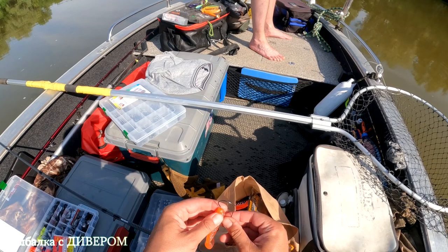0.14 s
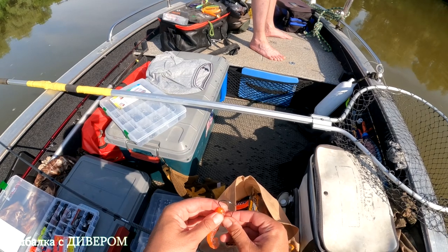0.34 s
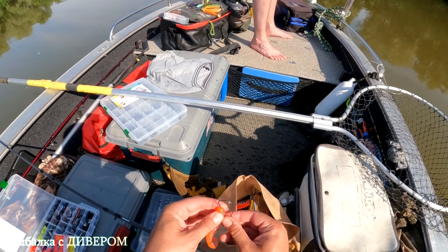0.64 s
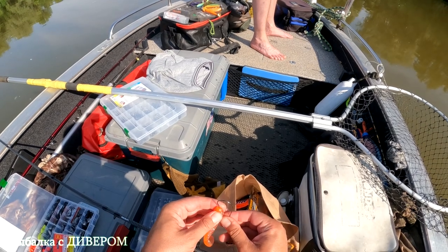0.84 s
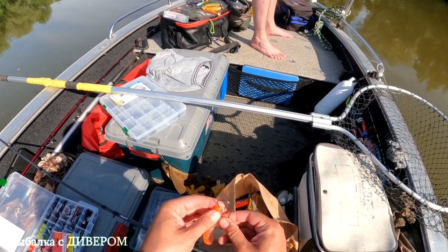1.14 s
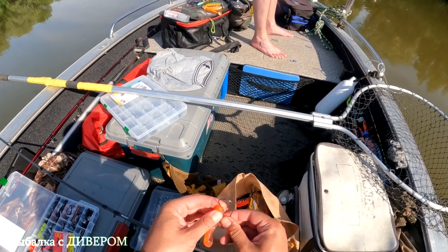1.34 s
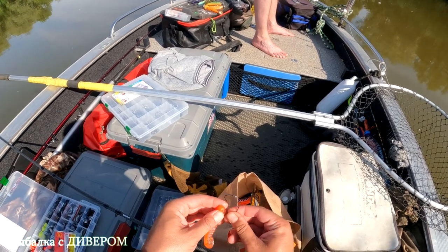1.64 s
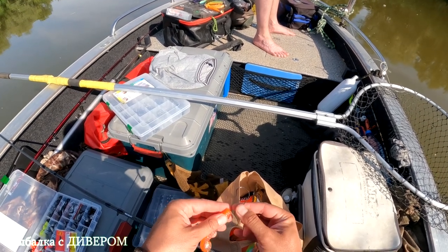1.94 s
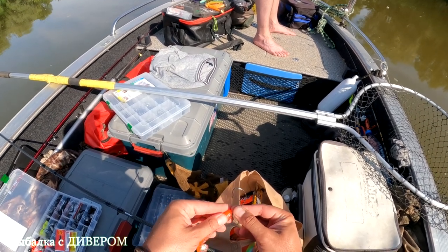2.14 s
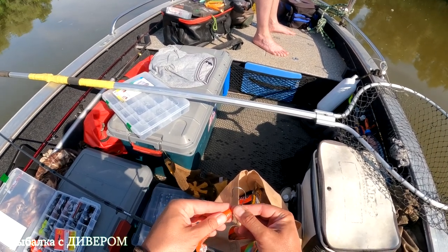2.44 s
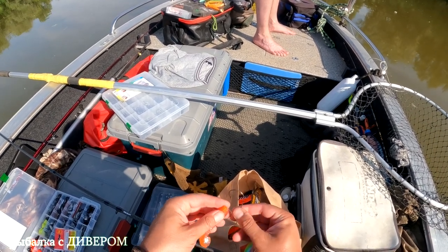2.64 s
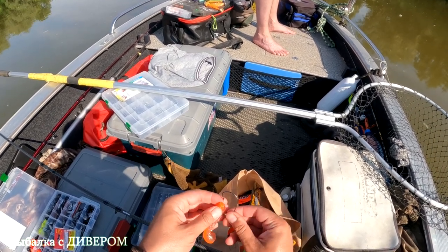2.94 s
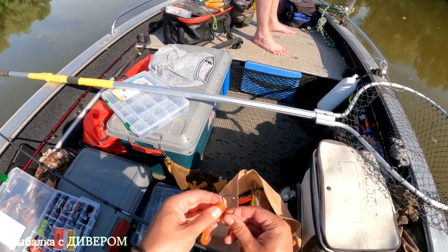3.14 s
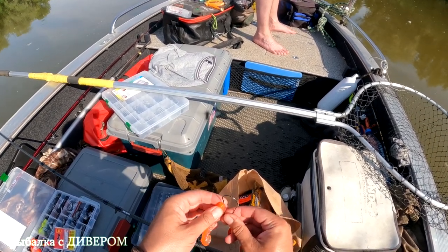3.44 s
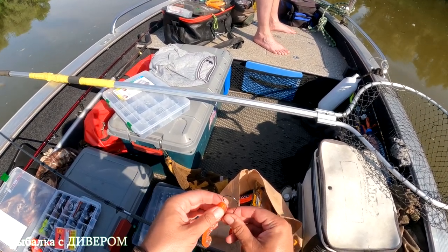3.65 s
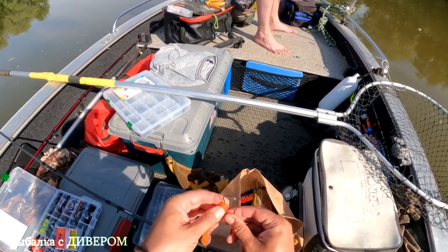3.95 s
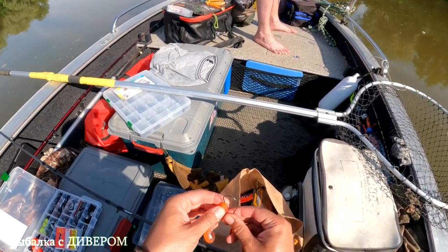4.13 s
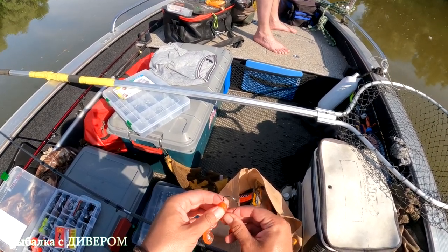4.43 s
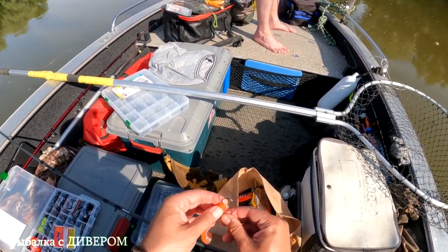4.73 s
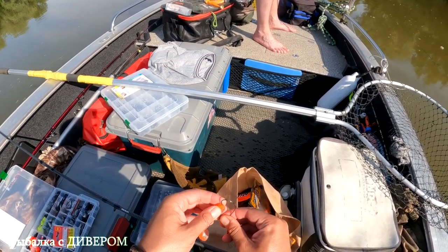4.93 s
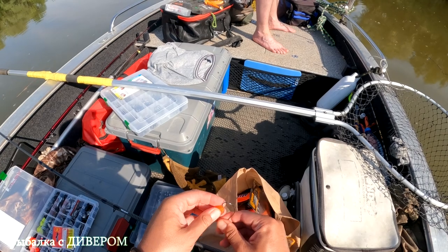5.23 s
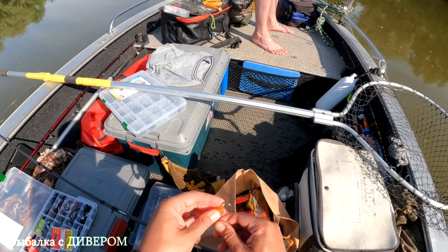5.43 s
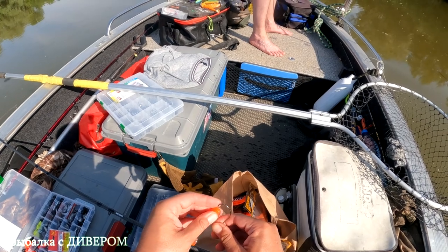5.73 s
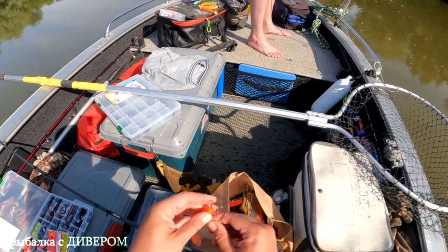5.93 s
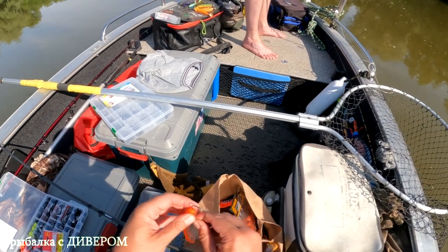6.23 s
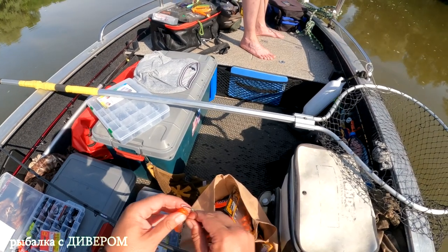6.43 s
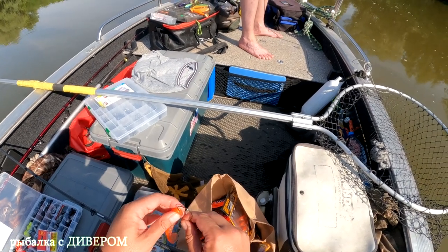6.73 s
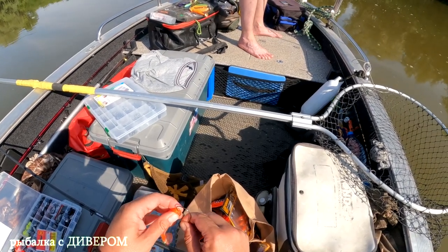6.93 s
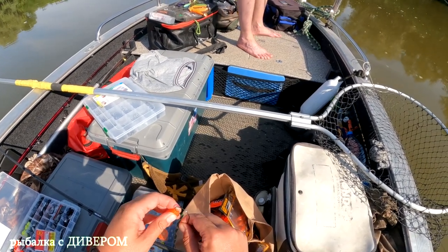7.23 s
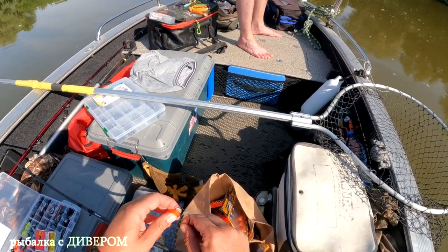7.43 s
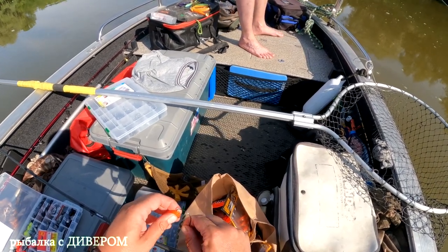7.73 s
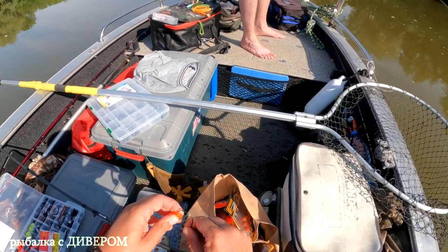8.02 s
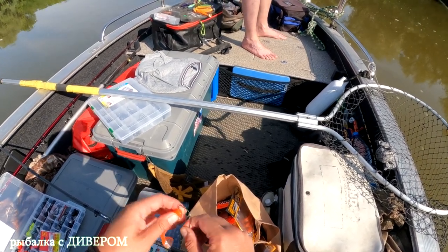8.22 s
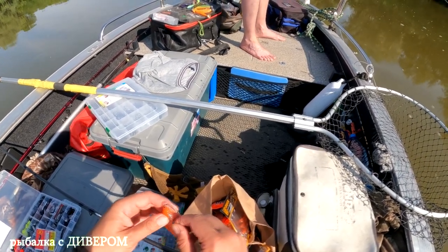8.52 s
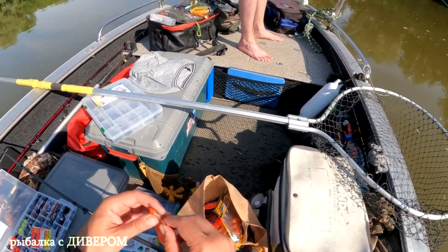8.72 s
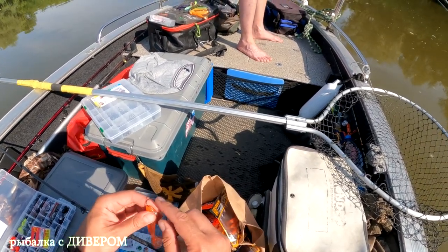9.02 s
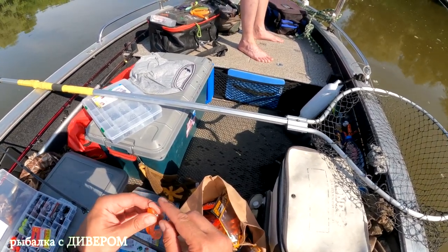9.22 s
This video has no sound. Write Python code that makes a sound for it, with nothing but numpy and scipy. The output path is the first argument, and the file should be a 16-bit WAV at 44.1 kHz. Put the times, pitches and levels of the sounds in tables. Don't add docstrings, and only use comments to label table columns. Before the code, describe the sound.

Outdoor stereo from a boat on calm water, with low drone and faint insect hiss throughout. A bird calls sharply now and then; a frog pumps rattling pulses; dry wing scrapes buzz in the reeds. Mid-way a clear finch song rises from faint notes, trills downward and ends in a flourish. Distant birds then swell together and fade, with small clicks and a brief scrape on deck at the end.

```python
import sys
import numpy as np
from scipy import signal
from scipy.fft import rfft, irfft
from scipy.io import wavfile
from scipy.ndimage import uniform_filter1d

SR = 44100
rng = np.random.default_rng(int(sys.argv[2]) if len(sys.argv) > 2 else 0)


def decibels_to_gain(level_db):
    exponent = np.asarray(level_db, float) / 20
    return 10 ** exponent


def unload_wav(signal):
    wavfile.write(
        sys.argv[1],
        SR,
        np.round(np.clip(np.atleast_2d(signal).T, -1, 1) * 32767).astype(np.int16),
    )


N = 413216
HZ = np.maximum(np.fft.rfftfreq(N, 1 / SR), 1)
T = np.arange(N) / SR

# (t/s from its start, f/Hz, level/dB[, warble depth/Hz])
RISE = [(0, 4730, -29), (.012, 5120, -10), (.022, 5396, -6.5), (.035, 5550, -39)]
TICK = [(0, 7300, -4, 300), (.006, 6820, -1.5, 400), (.016, 6200, 3, 400), (.024, 5850, 1, 300)]
SEET = [(0, 5350, -4, -600), (.018, 5450, 0, -550), (.028, 5600, 4, -420), (.04, 5550, -2, -400)]
CHIRP = [(0, 7010, -24.5, 1), (.003, 4390, -6.5, 3), (.006, 4590, -13, 294), (.011, 4606, -3.5, 148),
         (.016, 4680, -2, 68), (.023, 4465, -13.5, 150), (.03, 4311, -10, -1)]
GULP = [(0, 3240, -8, 251), (.012, 3210, -8.5, 250.5), (.03, 3130, -7.5, 200), (.042, 2955, -10, 150),
        (.052, 2924, -21, 150)]
FLICK = [(0, 3970, -8, 100), (.005, 4460, -13.5, 200), (.01, 4965, 3.5, 200.8), (.015, 5236, -14, 150),
         (.02, 5150, -32, 100)]
RASP = [(0, 5250, -15, 1150), (.02, 5150, -5, 1200), (.05, 4700, -2, 1000), (.065, 4300, -4, 800)]
HOLD = [(0, 1000, -9), (.02, 1000, 0), (.1, 1002, -2), (.16, 1000, -16)]
RATTLE = [(0, 3740, -17, 300), (.006, 3700, -3, 330), (.022, 3774, 1.5, 300), (.034, 3760, -6.5, 327.6),
          (.042, 3710, -9, 298.3)]
PIP = [(0, 5800, -18), (.005, 5720, -6), (.013, 5620, -6), (.019, 5560, -20)]
SCOOP = [(0, 3450, -20, 0), (.006, 3150, -8, 0), (.009, 3050, 1, 0), (.014, 2800, -17, 100),
         (.028, 2200, -17, 200), (.045, 2080, -15, 200), (.06, 2250, -17, 200), (.075, 2700, -24, 200)]
SPIKE = [(0, 4360, -13, 0), (.006, 6700, -16, 0), (.012, 7210, -18, 200), (.021, 6900, -13, 400),
         (.028, 6050, -3, 450), (.04, 4880, -4, 402), (.048, 4170, -11.5, 202)]
ARCH = [(0, 1600, -50), (.02, 1950, -24), (.04, 2550, -18), (.057, 3064, -2), (.066, 3300, -12),
        (.076, 3560, -3), (.088, 3000, -5), (.094, 2700, -16), (.11, 1900, -22)]
SLIDE = [(0, 3950, -6, 850), (.05, 3500, -2, 900), (.12, 3150, -5, 900), (.2, 2750, -9, 800),
         (.255, 2400, -13, 600), (.28, 2150, -15, 200)]
PINK = [(0, 2900, -32), (.021, 3550, -26), (.026, 4000, -5), (.04, 4105, 0), (.056, 4160, -3),
        (.068, 4190, -12), (.076, 4190, -38)]
DROP = [(0, 4870, -22), (.012, 4760, -10), (.035, 4713, -1.5), (.06, 4685, -16), (.105, 4680, -7),
        (.125, 4350, -18)]
FALL = [(0, 4070, -17), (.02, 3600, -5), (.05, 2970, -6), (.08, 2800, -20)]
LIFT = [(0, 2860, -21, 57), (.01, 2932, -5.5, 78), (.022, 3156, -4, 200), (.034, 3675, -0.5, 220),
        (.052, 4320, -1.5, 120), (.068, 4370, -22, 0)]
WHIT = [(0, 2690, -30), (.012, 3450, -12), (.022, 3810, -6), (.03, 4050, -2), (.044, 4120, -0.5),
        (.056, 4160, -8), (.064, 4190, -30)]
BLOB = [(0, 3910, -14, 202), (.005, 3903, 0, 250), (.016, 3860, -2, 200), (.021, 3290, -10, 100),
        (.03, 3150, -9, 100), (.042, 2930, -12, 100), (.05, 2860, -24, 0)]
DIVE = [(0, 4700, -8, 100), (.012, 4620, 0, 150), (.022, 3700, -6, 200), (.04, 2700, -4, 200),
        (.05, 2500, -14, 100)]
CLIMB = [(0, 2460, -14), (.015, 2750, -4), (.04, 3200, 1.5), (.055, 3300, -12)]
FADING = [(0, 4130, -1, 150), (.04, 4020, 0, 200), (.07, 4040, -9, 120), (.13, 4080, -20, 60)]


def unit(x):
    return x / np.sqrt(np.mean(x ** 2))


def along(table):
    hz, value = np.transpose(table)
    return np.interp(np.log(HZ), np.log(hz), value)


def peak(x, hz, width_hz):
    return irfft(rfft(x) / (1 + ((HZ ** 2 - hz ** 2) / (HZ * width_hz)) ** 2), N)


def walk(rate):
    k = int(SR / rate)
    held = np.repeat(rng.standard_normal(N // k + 1), k)
    return 1.295 * uniform_filter1d(uniform_filter1d(held, k), k)[:N]


def panned(x, pan_db):
    return np.array([x * decibels_to_gain(pan_db / 2), x * decibels_to_gain(-pan_db / 2)])


def add(out, s, x):
    i = int(s * SR)
    out[..., i:i + x.shape[-1]] += x[..., :N - i]


def scatter(t60, db, apart):
    t = np.arange(0, 1.2, 1 / SR)
    leaves = rng.standard_normal((3, len(t))) * decibels_to_gain(-60 * t / t60) * (1 - np.exp(-t / 0.0066))
    return decibels_to_gain(db) * (leaves[0] + apart * leaves[1:]) / np.sqrt(np.sum(leaves[0] ** 2))


def bank(x, bounce, echoes, twigs, tail, pan_db):
    near = x + decibels_to_gain(bounce[1]) * np.roll(x, int(bounce[0] * SR))
    near = near + sum(decibels_to_gain(db) * np.roll(x, int(s * SR)) for s, db in echoes)
    leaves = scatter(*twigs, apart=0.43) + scatter(*tail, apart=0.94)
    return panned(near, pan_db) + signal.fftconvolve(x[None], leaves, axes=1)[:, :N]


def sing(phrases, flutter_db, waver_hz, overtone_db=-46):
    out = np.zeros(N)
    waver, slip = waver_hz * walk(220), .04 * walk(50)
    for parts, drift, beats in phrases:
        for shape, warble_hz, after_s, part_db, tune in parts:
            s, hz, db, *depth = np.transpose(shape)
            t = np.arange(0, s.max(), 1 / SR)
            wide = np.interp(t, s, depth[0]) if depth else 0 * t
            for k, (beat, beat_db) in enumerate(beats):
                now = beat + after_s + t
                strokes = warble_hz * t * (1 - .525 * t)
                stroke = (strokes + np.interp(now, T, slip)) % 1
                pitch = tune * (1 + drift * k) * np.interp(t, s, hz)
                pitch = pitch + wide * (1 - 2 * stroke) + np.interp(now, T, waver)
                phase = 2 * np.pi * np.cumsum(pitch) / SR
                gap = np.clip(abs(wide) / 450, 0, 1) * np.cos(np.pi * stroke) ** 2
                swell = (1 - gap) ** (1.2 + np.clip(wide - 500, 0, 300) / 500)
                level = decibels_to_gain(beat_db + part_db + 7.0 + np.interp(t, s, db))
                voice = np.sin(phase) + decibels_to_gain(overtone_db) * np.sin(2 * phase)
                add(out, now[0], level * swell * voice)
    return out * decibels_to_gain(flutter_db * walk(110))


def hum():
    # (f/Hz, level/dB per Hz)
    colour = [(22, -4.5), (31, -8), (38, -12), (70, -27), (118, -28.5), (162, -15.5), (279, -25),
              (787, -40.5), (1060, -34.5), (1690, -38), (2010, -42), (2640, -44), (4010, -46.5),
              (8000, -49.5), (10400, -83.5), (17600, -120)]
    # (f/Hz, left minus right/dB)
    lean = [(60, 3.5), (110, 3.5), (200, -9.5), (380, -4), (700, -8), (1290, -0.5), (2380, 2), (4400, 2.5),
            (8120, 1), (15000, 8)]
    # (f/Hz, likeness of the channels, 0 to 1)
    likeness = [(25, 0.67), (70, 0.61), (200, 0.5547), (600, 0.2), (1500, 0.49), (6000, 0.68)]
    # (t/s, change of treble hiss/dB, change of drone/dB)
    breeze = [(0, 1, 1), (.9, -1.4, 0.5), (1.5, -3, -0.2), (1.95, -4, 1), (2.3, 3, 0), (4, 4.5, -0.9),
              (4.9, -1, -0.2), (5.3, -1.5, 3.5), (5.9, 5.5, 1), (6.6, 1, -0.9), (7, 2, -0.4),
              (9.37, -1.5, 0)]
    alike = np.clip(along(likeness), 0, 1)
    mid, side = rfft(rng.standard_normal((2, N)))
    pair = np.array([mid * np.sqrt(1 + alike) + k * side * np.sqrt(1 - alike) for k in (1, -1)])
    pair = pair * decibels_to_gain(along(colour) + np.array([[.5], [-.5]]) * along(lean))
    pair = pair * (HZ > 22) / (1 + (HZ / 8500) ** 12)
    out, (s, hiss_db, drone_db) = 0, np.transpose(breeze)
    for octave in range(9):
        share = np.clip(1 - abs(np.log2(HZ / 31.25) - octave), 0, 1)
        stir_db = hiss_db if octave > 5 else drone_db * (octave > 2)
        swell_db = 1.26 * walk(2.49) + 1.8 * walk(9) + np.interp(T, s, stir_db)
        out = out + irfft(pair * share, N) * decibels_to_gain(swell_db)
    return decibels_to_gain(-57) * out / np.std(out.mean(0))


def rocking():
    # (t/s, level/dB, left minus right/dB)
    sway = [
        (0.0, -62, -4),
        (0.57, -46, -12.5),
        (1.36, -58, -6),
        (1.69, -46, -6),
        (6.73, -49, -5.5),
        (7.7, -42.5, -2),
        (8.27, -56, -4),
        (9.37, -46.5, -4),
    ]
    s, db, pan_db = np.transpose(sway)
    one, other = peak(rng.standard_normal((2, N)), 9.04, 9.0)
    pair = np.array([one + 0.34 * other, one - 0.61 * other])
    return pair / np.std(one) * decibels_to_gain(np.interp(T, s, db) + np.array([[.5], [-.5]]) * np.interp(T, s, pan_db))


def knocks():
    # (t/s, peak level/dB, f/Hz, t60/s, width of the crack/Hz)
    hits = [(0.364, -51.5, 2995, 0.023, 300), (1.765, -62, 5630, 0.022, 900), (1.82, -54, 1710, 0.037, 200),
            (5.097, -42.5, 1380, 0.014, 1196), (5.097, -49, 2050, 0.0086, 608),
            (5.315, -59.5, 563, 0.45, 100), (5.75, -61, 480, 0.3, 99.48), (6.01, -64, 1066, 0.13, 200),
            (7.28, -56.5, 1610, 0.061, 200), (7.411, -55.5, 1800, 0.1251, 150),
            (9.216, -49.5, 1990, 0.02037, 500), (9.204, -54, 4500, .006, 4000)]
    out, t = np.zeros(N), np.arange(0, .15, 1 / SR)
    for s, db, hz, t60, width_hz in hits:
        wobble = signal.lfilter([1], [1, -np.exp(-np.pi * width_hz / SR)], rng.standard_normal(len(t)))
        envelope = decibels_to_gain(db - 60 * t / t60) * (1 - np.exp(-t * width_hz / 0.23))
        add(out, s, envelope * (1.0 + .5 * unit(wobble)) * np.sin(2 * np.pi * hz * t))
    return out


def drag():
    # (t/s, level/dB)
    scrape = [
        (9.27, -93),
        (9.31, -64),
        (9.34, -61),
        (9.37, -63),
    ]
    grit = rng.standard_normal(N) * decibels_to_gain(3.6 * walk(150))
    boards = unit(peak(grit, 1400, 700) + decibels_to_gain(-5) * peak(grit, 2400, 600))
    return boards * decibels_to_gain(np.interp(T, *np.transpose(scrape), left=-140))


def flock(count=2400):
    # (t/s, level/dB)
    swell = [
        (6.95, -88),
        (7.15, -65),
        (8.09, -63),
        (8.45, -62.5),
        (8.56, -73.5),
        (9.37, -82.5),
    ]
    # (f/Hz, level/dB per Hz)
    colour = [(710, -27), (1200, -1.5), (1870, -4.5), (3180, 2.5), (3970, 0), (7500, -11), (9750, -32),
              (16500, -120)]
    out = np.zeros(N)
    for when, pitch, glide, length, size in rng.random((count, 5)):
        t = np.arange(0, 0.015 + 0.05723 * length ** 2, 1 / SR)
        hz = 900 * 7.5 ** pitch * (1 + 0.25395 * (glide - .5) * t / 0.09863)
        whistle = np.hanning(len(t)) * np.sin(2 * np.pi * np.cumsum(hz) / SR)
        add(out, 6.9 + 2.4 * when, decibels_to_gain(4 * size ** 3) * whistle)
    wash = decibels_to_gain(11.5) * rng.standard_normal(N) * decibels_to_gain(2.1 * walk(17))
    out = (unit(out) + wash) * (T > 6.9)
    out = irfft(rfft(out) * decibels_to_gain(along(colour)) * np.sqrt(HZ), N)
    s, db = np.transpose(swell)
    return out / np.std(out[T > s[0]]) * decibels_to_gain(np.interp(T, s, db, left=-120))


def distant_birds():
    # ([(syllable, warble/Hz, delay/s, level/dB, pitch factor)], pitch change per beat, [(t/s, level/dB)])
    phrases = [([(DROP, 60, 0, 0, 1.001), (BLOB, 170, .118, 1.9, 1.001)], 0, [(8.548, -53.5)]),
               ([(FALL, 60, 0, 0, 1.03)], 0.014, [(.13, -71), (.35, -68)]), ([(DIVE, 130, 0, 0, 1.001)],
               .001, [(.51, -74), (.628, -74), (.745, -75), (.855, -79)]), ([(DIVE, 130, 0, 0, .86)],
               .001, [(1.03, -85), (1.77, -80)]), ([(CLIMB, 60, 0, 0, 1.12)], .001, [(.45, -82),
               (8.77, -70), (8.87, -69), (8.96, -73)]), ([(CLIMB, 60, 0, 0, 0.8947)], .001, [(1.055, -81)]),
               ([(PIP, 60, 0, 0, .8)], .001, [(1.2, -82), (6.765, -70), (6.785, -67), (6.815, -72)]),
               ([(ARCH, 60, 0, 0, 1.08)], 0, [(1.225, -78), (1.25, -75), (1.275, -78)]),
               ([(FADING, 150, 0, 0, 1)], 0, [(.001, -61)]), ([(HOLD, 60, 0, 0, 3.22)], 0, [(6.65, -86),
               (7.16, -79), (7.6, -78), (8.07, -70), (8.3, -85), (8.56, -76)]), ([(HOLD, 60, 0, 0, 4)],
               -.04, [(7.18, -76), (8.275, -68)]), ([(HOLD, 60, 0, 0, 2.65)], 0, [(7.36, -77), (7.78, -73),
               (7.99, -74)]), ([(HOLD, 60, 0, 0, 1.9)], 0, [(7.95, -80), (8.13, -78), (8.24, -81)])]
    paths = ((.001, -14), [], (.08, -3), (.9, -7), -.7)
    return bank(sing(phrases, 4, 30), *paths)


def frog(rate_hz=310, length_s=0.059):
    # (t/s, peak level/dB)
    croaks = [(2.371, -51.5), (2.439, -43), (2.548, -43.5), (2.6521, -47), (2.752, -45.5), (2.869, -44),
              (2.9699, -43.5), (3.0678, -44.5), (3.1805, -44.5), (3.289, -43.5), (3.3946, -43),
              (3.5, -43.5), (3.625, -46), (6.53, -53), (6.659, -60.5), (6.755, -60), (6.86, -62),
              (6.961, -63), (7.061, -64)]
    low, high = np.zeros((2, N))
    for (s, db), chance in zip(croaks, rng.standard_normal((len(croaks), 2, 30))):
        when = np.cumsum(1 + 0.23 * chance[0]) / rate_hz
        done = np.clip(when / length_s, 0, 1)
        size = decibels_to_gain(db + 4 * chance[1]) * np.sin(np.pi * done ** 1.1)
        at = ((s - .008 + when) * SR).astype(int)
        np.add.at(low, at, size * (1 - done))
        np.add.at(high, at, size * done)
    sac = peak(peak(low, 2330, 560), 2350, 800) + peak(peak(high, 2560, 720), 2450, 1000)
    chest = decibels_to_gain(-17.5) * peak(low + high, 1370, 520)
    edge = decibels_to_gain(-18.5) * peak(high, 5280, 1100)
    return decibels_to_gain(27.5) * (sac + chest + edge)


def wing_scrapes(stroke_s=0.003):
    # (first t/s, last t/s, beat/s, peak level/dB, wing f/Hz)
    bouts = [(0.7837, .950, 0.056, -59, 9600), (0.976, .978, 0.083, -51, 8800),
             (1.017, 1.472, 0.049, -50.5, 8850), (1.966, 2.565, 0.031, -68, 10400),
             (2.870, 3.0906, 0.055, -60, 8300), (7.66, 8.12, .031, -66, 10300),
             (6.6, 6.65, 0.025, -60, 10100), (6.828, 6.853, 0.025, -62, 9700),
             (6.931, 7.205, 0.055, -59, 9500), (6.745, 7.28, .055, -65, 8600),
             (7.54, 8.24, 0.062, -58, 8350), (8.143, 8.143, .07, -54, 7050),
             (8.272, 8.509, 0.079, -51, 6980), (8.29, 8.56, 0.045, -57, 8450), (8.62, 9.3, 0.04, -62, 8550)]
    out, t = np.zeros((2, N)), np.arange(0, .02, 1 / SR)
    stroke = t / stroke_s * np.exp(1 - t / stroke_s)
    for first, last, beat, bout_db, wing_hz in bouts:
        hiss_db = 4 * (wing_hz - 9000) / 1000
        for s in np.linspace(first, last, 1 + round((last - first) / beat)):
            for late, back_db in ((0, 0), (.34 * beat, -1)):
                chance = rng.standard_normal(3)
                db = bout_db + back_db + 1.5 * chance[0]
                hz = wing_hz * (1 + .01 * chance[1])
                scrape = rng.standard_normal((3, len(t))) * stroke
                tone = np.sin(2 * np.pi * hz * t) + 0.47 * np.sin(2 * np.pi * min(1.152 * hz, 10400) * t)
                ring = t * 1900 * np.exp(1 - t * 1900) * tone
                wing = panned(decibels_to_gain(db - 21) * np.convolve(scrape[0], ring)[:len(t)], 1.5 + 3 * chance[2])
                hiss = decibels_to_gain(db - 25 + hiss_db) * np.diff(scrape[1:], 2, prepend=np.zeros((2, 2)))
                add(out, s + late, wing + hiss)
    return out


def wing_flicks():
    # (t/s, peak level/dB)
    early = [
        (2.7453, -62),
        (2.8331, -64),
        (2.87, -53),
        (2.8875, -63),
        (2.9259, -54),
        (2.9823, -49),
        (3.0353, -53),
        (3.0546, -51),
        (3.0905, -49),
    ]
    # (t/s, peak level/dB)
    later = [(3.9138, -66), (3.9303, -57), (3.9672, -63), (3.9846, -58), (4.0076, -69), (4.033, -57),
             (4.0679, -66), (4.0859, -51), (4.1218, -60), (4.1413, -63), (4.1757, -69), (4.1932, -60),
             (4.2445, -61), (4.2805, -68), (4.3009, -60), (4.3338, -69), (4.3513, -63), (4.3897, -69)]
    flicks, t = np.zeros(N), np.arange(0, .02, 1 / SR)
    for s, db in list(early) + list(later):
        add(flicks, s, decibels_to_gain(db + 6) * rng.standard_normal(len(t)) * np.exp(-t / .0014))
    return panned(peak(flicks, 9200, 2000), 1.5)


def far_grasshoppers():
    # (t/s, buzz level/dB)
    swell = [
        (0.0, -79),
        (0.63, -91),
        (1.2, -73),
        (1.64, -80.5),
        (2.0, -79),
        (2.5, -78),
        (2.69, -93),
        (8.43, -72.5),
        (8.65, -80),
        (9.37, -80.5),
    ]
    noise = rng.standard_normal((3, N)) * decibels_to_gain(2.2 * walk(120))
    noise = noise[0] + noise[1:]
    buzz = peak(noise, 10020, 1500) + decibels_to_gain(-16.0) * peak(noise, 11500, 2500) + decibels_to_gain(2.5) * peak(noise, 8800.0, 910)
    chorus = decibels_to_gain(-76.5) * unit(peak(noise, 6670, 820))
    return chorus + unit(buzz) * decibels_to_gain(np.interp(T, *np.transpose(swell)) + np.array([[3.0], [0.1]]))


def grasshoppers():
    near = wing_scrapes() + wing_flicks()
    reeds = signal.fftconvolve(near, scatter(0.07, -7, apart=0.72), axes=1)[:, :N]
    return near + reeds + far_grasshoppers()


def pink_caller():
    # ([(syllable, warble/Hz, delay/s, level/dB, pitch factor)], pitch change per beat, [(t/s, level/dB)])
    calls = [
        ([(SEET, 50, -.032, -22, 1.03), (SEET, 230, -.03, -20, 1.12), (SEET, 230, -.02, -22, .96), (PINK, 60, 0, 0, 0.99)], -0.0013, [(.175, -47.5), (2.012, -51.5), (2.293, -51), (3.427, -49.5)]),
        ([(PINK, 60, 0, 0, 0.99)], 0, [(3.37, -69), (3.715, -51), (7.335, -67), (7.66, -59)]),
        ([(SEET, 50, -0.041, -18, 1), (SEET, 230, -.045, -22, 1.2), (SEET, 230, -.03, -24, 1), (SPIKE, 300, 0.004, -3, .77), (WHIT, 60, -.004, 0, 1)], 0, [(6.525, -45)]),
    ]
    paths = ((0.00098, -24), [(.04, -20), (.066, -13)], (.07, -9), (1.15, -11.5), -0.68)
    return bank(sing(calls, 2, 20), *paths)


def finch():
    # ([(syllable, warble/Hz, delay/s, level/dB, pitch factor)], pitch change per beat, [(t/s, level/dB)])
    song = [
        ([(TICK, 250, 0, 0, 0.9816)], -0.0019, [(3.118, -71), (3.293, -66), (3.463, -60), (3.613, -60), (3.769, -60.5)]),
        ([(RISE, 60, 0, 0, 0.99)], -.004, [(2.968, -57.5), (3.158, -53), (3.333, -49.5), (3.505, -46.5), (3.657, -42.5), (3.81, -41.5)]),
        ([(CHIRP, 60, 0, 0, 1.015), (RATTLE, 190, 0.026036, 0, 1.019), (GULP, 190, 0.026, -8, 1.001), (FLICK, 200, .073, -0.85, 1.001), (PIP, 60, 0.064, -15, 1)], -0.006, [(3.93, -48.5), (4.077, -46), (4.225, -44.5), (4.37, -43.5), (4.517, -43.5), (4.66, -44.5), (4.807, -43)]),
        ([(SCOOP, 150, 0, 0, 1.001), (LIFT, 160, .058, -1.5, 1.001)], 0.001057, [(4.947, -41.5), (5.118, -42), (5.294, -42), (5.468, -41.5)]),
        ([(SPIKE, 200, 0, 0, 1.001)], -0.004, [(5.644, -43.5), (5.734, -42), (5.82, -42)]),
        ([(ARCH, 60, 0, 0, 0.97)], 0, [(5.912, -40.5)]),
        ([(RASP, 170, 0, 0, 1.001), (SLIDE, 64.4, 0.056, 0, 1)], 0, [(6.084, -41.5)]),
    ]
    paths = ((0.001564, -25.5), [(.019, -14)], (0.023, -2), (1, -9), -3.4)
    return bank(sing(song, 2, 45), *paths)


def scene():
    far = bank(frog(), (.002, -8), [], (.06, -3), (.5, -8), -0.27)
    far = far + decibels_to_gain(-0.5) * bank(flock(), (.0015, -6), [], (.05, -8), (.4, -4), -.1)
    boat = bank(knocks() + drag(), (.002, -12), [], (.03, -14), (.2, -14), -.1)
    birds = finch() + pink_caller() + distant_birds()
    return birds + far + boat + grasshoppers() + hum() + rocking()


def roll_off(x):
    return signal.sosfilt(signal.butter(12, 15600, fs=SR, output="sos"), x)


def record(dry):
    ports = [(300, -0.0046), (900, -0.98), (4000, -0.82), (5000, -0.28), (9000, 0.82)]  # (f/Hz, left lead/rad)
    left = irfft(rfft(dry[0]) * np.exp(1j * along(ports)), N)
    mix = irfft(rfft(np.array([left, dry[1]])) * (HZ < 15600), N)
    return roll_off(mix)


dry = scene()
out = record(dry)
unload_wav(out)
```